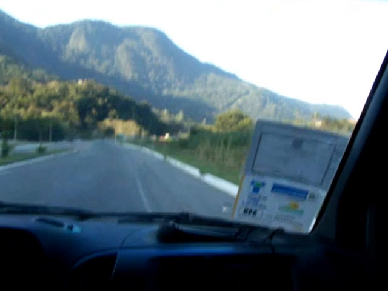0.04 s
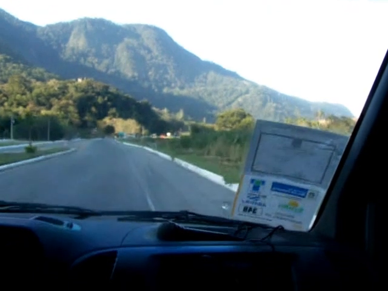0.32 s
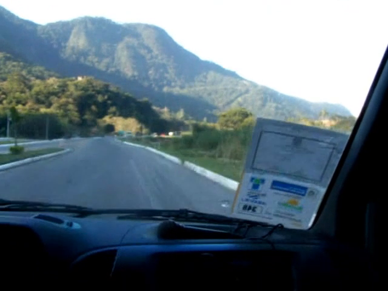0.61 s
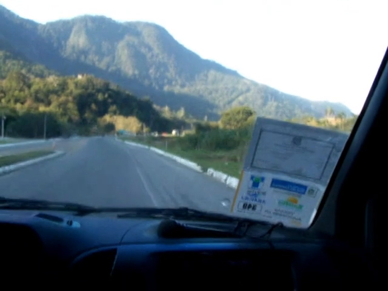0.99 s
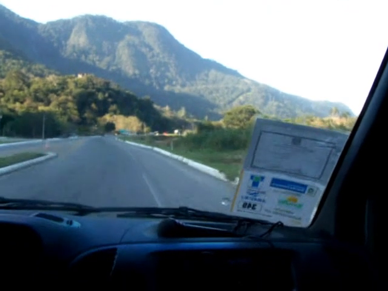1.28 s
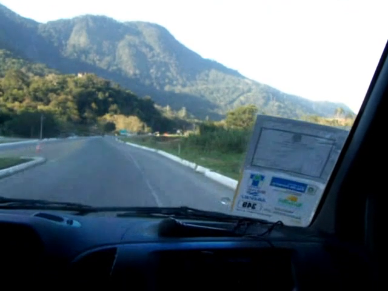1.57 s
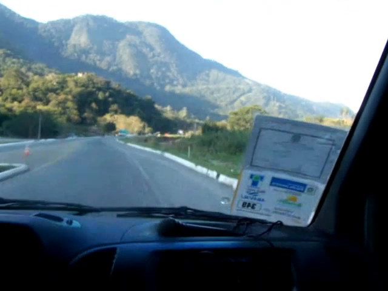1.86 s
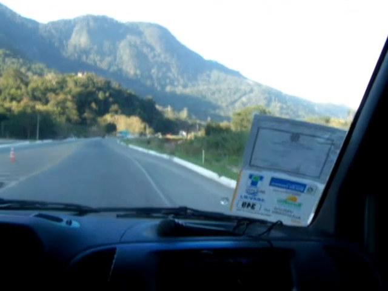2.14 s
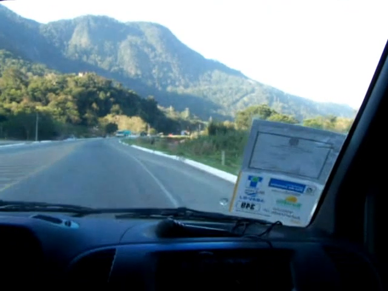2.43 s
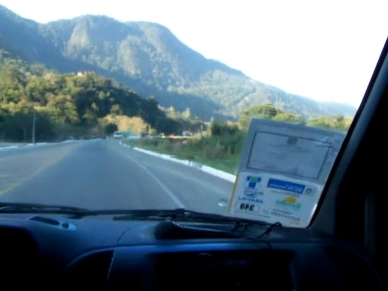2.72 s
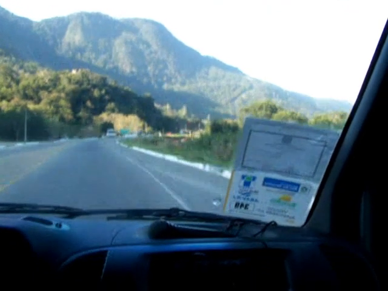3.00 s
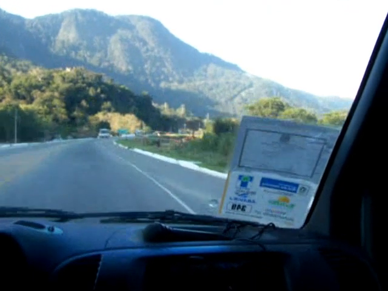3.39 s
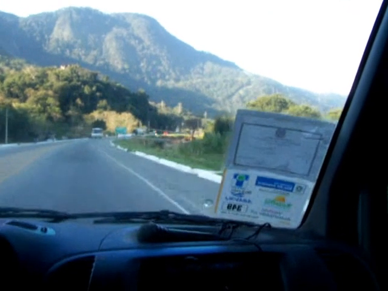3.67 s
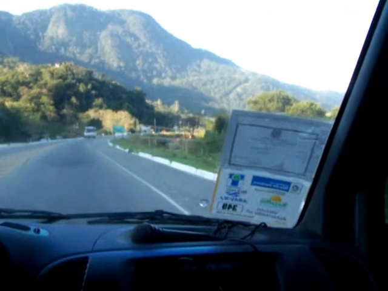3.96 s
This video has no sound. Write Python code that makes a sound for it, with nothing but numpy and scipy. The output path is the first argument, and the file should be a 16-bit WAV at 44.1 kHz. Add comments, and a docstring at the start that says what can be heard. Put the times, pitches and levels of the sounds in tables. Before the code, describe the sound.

Engine drone and road rumble fill the cabin of a gently accelerating car. Plastic trim ticks and rattles over early bumps, then something clicks sharply near the microphone. Near the end, a loose piece bounces quickly.

```python
"""Inside a car that gently gathers speed on a paved road.
The engine drones at harmonics of its rising firing rate, over broadband body rumble, tyre roar and air hiss.
On the rougher first stretch, bumps jolt the body and loose trim ticks, chatters and rattles.
One sharp click sounds close by. Later the hiss briefly rasps, the air in the tyres resonates,
and a loose part drops back, each bounce exciting its damped modes."""
import sys
import numpy as np
from scipy import signal
from scipy.fft import rfft, irfft
from scipy.io import wavfile
from scipy.ndimage import uniform_filter1d, minimum_filter1d

SR = 44100
rng = np.random.default_rng(int(sys.argv[2]) if len(sys.argv) > 2 else 0)


def dump_mix(stems):
    """Bounce the given channels to the path in sys.argv[1] as a 16-bit WAV at rate SR."""
    frames = np.atleast_2d(stems).T  # one column per channel
    limited = np.clip(frames, -1, 1)  # hard clip at full scale
    pcm = np.round(limited * 32767).astype(np.int16)
    wavfile.write(sys.argv[1], SR, pcm)


N = 176400
T = np.arange(N) / SR
IMPACT_T = np.arange(SR // 8) / SR
STRIKE_S, WAVER_DB, WAVER_RAD = .0003, .5, .06


def amp(db):
    """Decibels to amplitude ratio."""
    return 10 ** (np.asarray(db) / 20)


def unit(x):
    """Normalisation to rms 1."""
    return x / np.sqrt(np.mean(x ** 2) + 1e-20)


def curve(points):
    """Linear interpolation of breakpoints at every sample."""
    return np.interp(T, *np.transpose(points))


def tint(x, spectrum):
    """Spectral shaping on a log-frequency axis, at rms 1."""
    hz, db = np.transpose(spectrum)
    bins_hz = np.fft.rfftfreq(len(x), 1 / SR)
    gain = amp(np.interp(np.log(bins_hz + 1), np.log(hz), db))
    return unit(irfft(rfft(x) * gain, len(x)))


def low_pass(x, hz, size):
    """Windowed-sinc filter; a larger size cuts more steeply."""
    taps = signal.firwin(size, hz, window=("kaiser", 8), fs=SR)
    return signal.oaconvolve(np.pad(x, size // 2, "reflect", reflect_type="odd"), taps, "valid")


def drift(rate_hz):
    """Band-limited random modulation, from 1 Hz to about rate_hz."""
    f = np.fft.rfftfreq(N, 1 / SR)
    return unit(irfft(rfft(rng.standard_normal(N)) * (f > 1) / (1 + (f / rate_hz) ** 4), N))


def add(mix, start_s, sound):
    """Superposition of a sound at its start time."""
    part = mix[max(round(start_s * SR), 0):][:len(sound)]
    part += sound[:len(part)]


def pulse(start_s, rise_s):
    """Critically damped envelope, peaking at 1 after rise_s."""
    u = np.maximum(T - start_s, 0) / rise_s
    return u * np.exp(1 - u)


def ring(modes, ratio=1, spread=0):
    """Free decay of struck modes; spread scatters their phases, in cycles."""
    t = IMPACT_T
    tones = sum(amp(db - 60 * t / t60) * np.sin(2 * np.pi * (hz * ratio * t + spread * rng.random()))
                for hz, db, t60 in modes)
    return tones * np.minimum(t / STRIKE_S, 1)


def rush(levels, spectrum, flutter_db, patch_db):
    """Amplitude-modulated noise, fluttering as a whole and in time-frequency patches."""
    frames = signal.stft(rng.standard_normal(N), nperseg=512, noverlap=384)[2]
    patches = uniform_filter1d(rng.standard_normal(frames.shape), size=7, axis=0)
    patches = unit(uniform_filter1d(patches, size=14, axis=1))
    noise = signal.istft(frames * amp(patch_db * patches), nperseg=512, noverlap=384)[1][:N]
    flutter = amp(flutter_db * drift(rate_hz=25))
    return amp(curve(levels)) * unit(tint(noise, spectrum) * flutter)


# Engine firing rate: time_s, rate_hz
FIRING_RATE = [(0, 72), (.5, 74.6), (1.0, 76.6), (1.3, 77.2), (2.0, 78.7), (2.6, 79.6), (3.4, 81.2),
               (4, 82.3)]
# Fundamental drone and overtone hum: time_s, level_db
DRONE_LEVEL = [(0, -27), (.6, -24.5), (1.03, -28), (1.2, -20), (1.55, -18.5), (1.9, -16.5), (2.02, -11.5),
               (2.2, -17), (2.58, -15), (3.3, -17), (3.7, -14.5), (4, -16)]
HUM_LEVEL = [(0, -34), (.3, -27), (1.2, -23.5), (1.5, -28), (1.7, -20.5), (2.5, -21.3), (3.4, -20),
             (4, -17.5)]
# Overtones of the hum: harmonic_number, gain_db
HUM_HARMONICS = [(2, 0), (4, -15)]


def engine():
    """Periodic firing gives a harmonic series, each partial wavering in level and phase."""
    phase = 2 * np.pi * np.cumsum(curve(FIRING_RATE)) / SR
    harmonics = [(1, curve(DRONE_LEVEL))] + [(k, curve(HUM_LEVEL) + db) for k, db in HUM_HARMONICS]
    out = np.zeros(N)
    for k, db in harmonics:
        peak = np.sqrt(2) * amp(db + WAVER_DB * drift(rate_hz=8))
        out += peak * np.cos(k * phase + WAVER_RAD * drift(rate_hz=6.2))
    return out


# Body rumble and cabin boom envelopes: time_s, level_db
RUMBLE_LEVEL = [(0, -10), (.46, -17), (.77, -10.5), (.83, -23), (.91, -14.5), (1.27, -19), (1.35, -12),
                (1.45, -20), (1.92, -20), (1.98, -14), (2.29, -24.5), (2.97, -16), (3.21, -23.5),
                (4.0, -22)]
BOOM_LEVEL = [(0, -20), (1.25, -18.5), (1.6, -20.5), (2.8, -18.5), (3.7, -22.5)]
# Their spectra: frequency_hz, density_db
RUMBLE_SPECTRUM = [(8, -21), (20, -9), (33, -0.5), (46, -3), (60, -13.5), (90, -28.5), (200, -45),
                   (600, -90)]
BOOM_SPECTRUM = [(40, -25), (65, -8.5), (90, 4.5), (112, -4.5), (140, -4.5), (190, -6.5), (260, -12),
                 (500, -57.5)]


def body_rumble():
    """Forced vibration: the road shakes the body and the cabin booms."""
    shake = dict(flutter_db=.86, patch_db=.14)
    return rush(RUMBLE_LEVEL, RUMBLE_SPECTRUM, **shake) + rush(BOOM_LEVEL, BOOM_SPECTRUM, **shake)


# Tread roar envelope: time_s, level_db
ROAR_LEVEL = [(0, -25.5), (.8, -27), (1.1, -24.8), (1.37, -23.3), (1.55, -27.3), (1.7, -22.6),
              (1.98, -22.8), (2.1, -25.8), (2.42, -20.7), (2.7, -24), (2.96, -26.8), (3.12, -24.3),
              (3.42, -27.8), (3.72, -23.7), (4, -24.7)]
# Its spectrum: frequency_hz, density_db
ROAR_SPECTRUM = [(120, -9.5), (280, -2), (450, -2), (600, -4.5), (800, -10.5), (1000, -14), (1450, -12.5),
                 (2000, -24), (2600, -27), (5000, -40), (10000, -80.5)]


def tyre_roar():
    """Random excitation of the rolling tread radiates broadband noise."""
    return rush(ROAR_LEVEL, ROAR_SPECTRUM, flutter_db=.47, patch_db=1.17)


# Air hiss envelope: time_s, level_db
HISS_LEVEL = [(0, -29.5), (1.35, -29.5), (1.58, -33.5), (1.78, -29.5), (2.0, -31), (2.2, -32), (2.33, -28),
              (2.5, -32), (2.68, -30.5), (2.82, -31.5), (3.0, -33.5), (3.15, -31), (3.45, -34), (4, -31.5)]
# Its spectrum: frequency_hz, density_db
HISS_SPECTRUM = [(800, -18), (2100, -16.5), (2600, -11.5), (2950, -6), (3250, 0), (3650, -1.5), (4000, -4),
                 (4350, -10), (4750, -8.5), (5500, -20), (6500, -23.5), (8000, -35), (9300, -50),
                 (10500, -58.5)]


def air_hiss():
    """Transmission through the window seals lets in air and road noise as hiss."""
    return rush(HISS_LEVEL, HISS_SPECTRUM, flutter_db=.91, patch_db=1.7)


# Trim chatter envelope: time_s, level_db
CHATTER_LEVEL = [(0, -28.5), (.5, -32.5), (1.4, -32), (1.53, -51), (1.8, -37.5), (2.1, -49), (2.8, -34.5),
                 (3.05, -41.5), (4, -40)]
# Its spectrum: frequency_hz, density_db
CHATTER_SPECTRUM = [(400, -16.5), (900, 2.5), (1400, 4), (2600, -6.5), (3400, 0.5), (4800, -3),
                    (5500, -7.5), (8000, -27), (10000, -35.5), (12000, -65)]
# Road bumps that shake the trim and jolt the body: start_s, level_db
BUMPS = [(.325, -31), (.622, -30), (.714, -23.5), (.888, -29), (1.335, -29), (1.947, -31), (2.465, -29.5),
         (2.79, -33), (3.13, -34)]


def trim_chatter(contacts_per_s=1100, spread_db=3, clump_db=1.8, t60_s=.008):
    """Shot noise: tiny random contacts in loose trim, with a flurry at each bump."""
    sizes = amp(spread_db * np.minimum(rng.exponential(1, N), 4)) * rng.choice([-1, 1], N)
    impulses = sizes * (rng.random(N) < contacts_per_s / SR)
    contacts = signal.oaconvolve(impulses, amp(-60 * T[:SR // 32] / t60_s))[:N]
    grains = tint(contacts * rng.standard_normal(N), CHATTER_SPECTRUM)
    level = amp(curve(CHATTER_LEVEL)) * unit(amp(clump_db * drift(rate_hz=4.8)))
    for start_s, db in BUMPS:
        level = np.hypot(level, amp(db) * pulse(start_s, rise_s=.013))  # powers add
    return grains * level


# Ticks of plastic: start_s, level_db, pitch_ratio
TICKS = [(.065, -10.5, 1.04), (.078, -17, 0.77), (.424, -19, 1.2), (.560, -16, .8), (.656, -30, 1.4)]
# Modes of the plastic: pitch_hz, gain_db, t60_s
TICK_MODES = [(1316, -1.5, 0.024), (2000, -7, .015), (2480, 0, 0.015)]


def plastic_ticks():
    """Heavy damping cuts the ringing of struck plastic to a tick."""
    out = np.zeros(N)
    for start_s, db, ratio in TICKS:
        add(out, start_s, amp(db) * ring(TICK_MODES, ratio))
    return out


# Modes of the car body: pitch_hz, gain_db, t60_s
BODY_MODES = [(36, 21, .15), (85, 16, .12)]


def body_jolts():
    """Impulse response: each bump sets the body's low modes ringing."""
    out = np.zeros(N)
    for start_s, db in BUMPS:
        add(out, start_s, amp(db) * ring(BODY_MODES))
    return out


# Bright rattles: start_s, level_db
RATTLES = [(.456, -27), (.4904, -20), (.503, -25), (.5492, -21), (.6206, -27), (.632, -26), (.714, -25),
           (.741, -24.5), (.762, -19.5), (.8915, -21), (1.436, -28)]
# Their spectrum: frequency_hz, density_db
RATTLE_SPECTRUM = [(2300, -9), (3600, 1), (4900, -1.5), (6500, -16), (8500, -30), (11000, -60)]


def dashboard_rattles(contacts_per_s=4000, t60_s=.06):
    """Intermittent contact: trim buzzes against the dashboard in decaying bursts."""
    out, t = np.zeros(N), IMPACT_T
    for start_s, db in RATTLES:
        contacts = rng.standard_normal(len(t)) * (rng.random(len(t)) < contacts_per_s / SR)
        add(out, start_s, tint(contacts, RATTLE_SPECTRUM) * amp(db - 60 * t / t60_s))
    return out


# Suspension knocks: start_s, level_db
THUDS = [(.720, -22), (1.333, -24)]
# Their spectrum: frequency_hz, density_db
THUD_SPECTRUM = [(150, -6), (620, 2), (900, -6), (1300, -14), (5000, -30), (10000, -82)]


def suspension_thuds():
    """Damped impacts: the road knocks the suspension, giving pulses of dull noise."""
    return sum(amp(db) * pulse(start_s, rise_s=.01) * tint(rng.standard_normal(N), THUD_SPECTRUM)
               for start_s, db in THUDS)


# Crack that starts the click: frequency_hz, density_db
SNAP_SPECTRUM = [(500, -21), (1100, -4), (2400, 5), (4800, -14), (9000, -29), (12000, -41)]
# Modes of the click: pitch_hz, gain_db, t60_s
CLICK_MODES = [(1200, -3.5, .017), (1700, -8, .012), (2250, 1, .0095), (2600, -16, .05), (3480, -2.5, .013),
               (4060, -.5, .011), (4660, -.5, .0096)]


def sharp_click(start_s=1.4877, level_db=-1.5, snap_db=-6, snap_t60_s=.012):
    """Impact transient: a broadband crack with fast-decaying modes."""
    out, t = np.zeros(N), IMPACT_T
    snap = tint(rng.standard_normal(len(t)), SNAP_SPECTRUM) * amp(snap_db - 60 * t / snap_t60_s)
    add(out, start_s, amp(level_db) * (ring(CLICK_MODES) + snap))
    return out


# Rasp envelope: time_s, level_db
RASP_LEVEL = [(2.22, -60), (2.31, -30), (2.38, -33.5), (2.44, -32), (2.475, -28), (2.55, -31), (2.68, -50)]
# Its spectrum: frequency_hz, density_db
RASP_SPECTRUM = [(2500, -38.5), (3150, -12.5), (3550, 0), (3750, -2), (4100, -18.5), (6000, -58)]


def air_rasp():
    """Narrowband noise rises briefly out of the hiss."""
    return rush(RASP_LEVEL, RASP_SPECTRUM, flutter_db=.91, patch_db=1.7)


# Tyre cavity tone: time_s, level_db
CAVITY_LEVEL = [(2.72, -48), (2.88, -26), (3.06, -23.5), (3.27, -27.5), (3.4, -22.5), (3.6, -28),
                (3.76, -54)]


def tyre_cavity(pitch_hz=228):
    """Cavity resonance: the air in the tyres sings for a moment."""
    phase = 2 * np.pi * pitch_hz * T + WAVER_RAD * drift(rate_hz=5.8)
    return np.sqrt(2) * amp(curve(CAVITY_LEVEL)) * np.sin(phase)


# Bounces of the loose part: start_s, level_db
BOUNCES = [(3.2595, -18), (3.2610, -9), (3.2628, -11), (3.268, -15.5), (3.2722, -14.5), (3.278, -17.5),
           (3.286, -24), (3.296, -20), (3.301, -23), (3.321, -23), (3.329, -26)]
# Its modes: pitch_hz, gain_db, t60_s
LOOSE_MODES = [(1640, -4, .02), (3080, -6, .02), (3420, -4.5, .018), (4720, -6.5, .035), (5200, -10, .02)]
# Scrape of each bounce: frequency_hz, density_db
SCRAPE_SPECTRUM = [(300, -19), (800, -10), (1600, 1), (2200, -13), (3300, -1), (5100, -7), (6300, -15.5),
                   (10000, -39)]


def loose_part(scrape_db=-4.5, scrape_t60_s=.024):
    """Repeated impact: each bounce scrapes and, landing on another spot, rings at a shifted pitch."""
    out, t = np.zeros(N), IMPACT_T
    scrape_envelope = amp(scrape_db - 60 * t / scrape_t60_s) * np.minimum(t / STRIKE_S, 1)
    for start_s, db in BOUNCES:
        scrape = tint(rng.standard_normal(len(t)), SCRAPE_SPECTRUM) * scrape_envelope
        tones = ring(LOOSE_MODES, ratio=rng.uniform(.933, 1.05), spread=.88)
        add(out, start_s, amp(db) * (tones + scrape))
    return out


def scene():
    """Superposition of all sources at the front seat."""
    steady = engine() + body_rumble() + tyre_roar() + air_hiss() + trim_chatter()
    early = plastic_ticks() + body_jolts() + dashboard_rattles() + suspension_thuds()
    later = sharp_click() + air_rasp() + tyre_cavity() + loose_part()
    return (steady + early + later)[None]


def record(dry, limit_db=-1.5, recover_db_per_s=45):
    """A dull microphone, peak limiting, overload clipping and a band limit."""
    x = low_pass(dry[0], hz=9000, size=61)
    lows = uniform_filter1d(x, size=24)  # the limiter senses the rumble but misses the click
    over_db = np.maximum(20 * np.log10(abs(lows) + 1e-9) - limit_db, 0)
    ahead_db = -minimum_filter1d(-over_db, size=200)
    recovery_db = T * recover_db_per_s
    held_db = np.maximum.accumulate(ahead_db + recovery_db) - recovery_db
    duck_db = uniform_filter1d(held_db, size=200)
    clipped = np.clip(x * amp(-duck_db), -1, 1)
    return low_pass(clipped, hz=15800, size=511)[None]


dry = scene()
out = record(dry)
dump_mix(out)
```